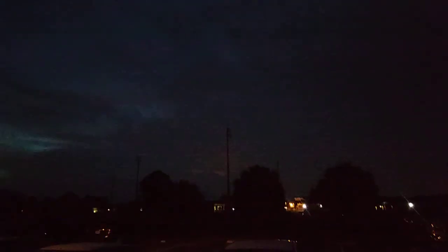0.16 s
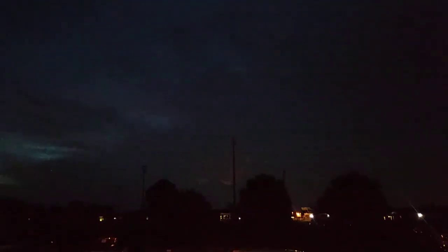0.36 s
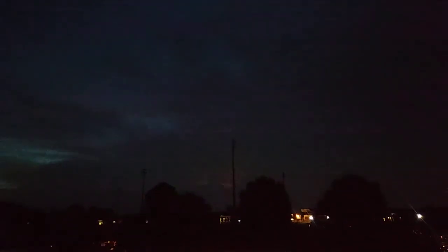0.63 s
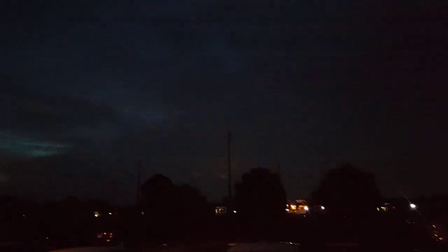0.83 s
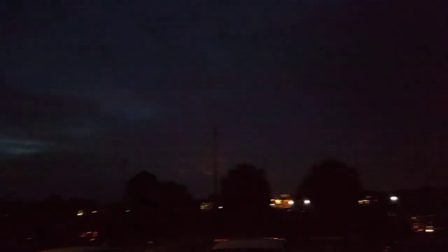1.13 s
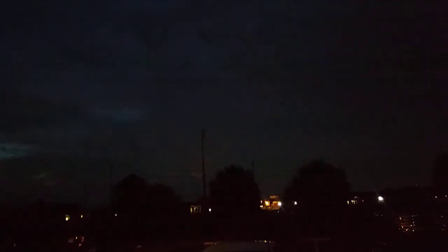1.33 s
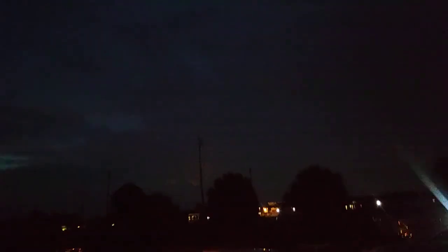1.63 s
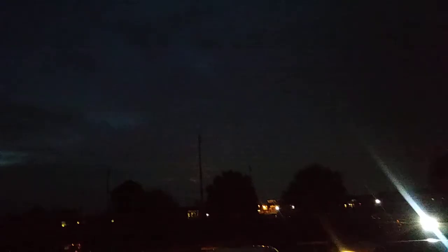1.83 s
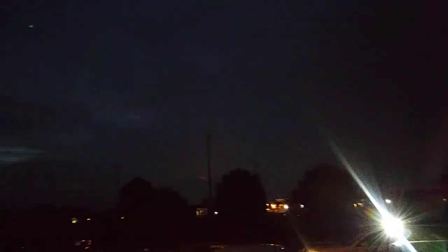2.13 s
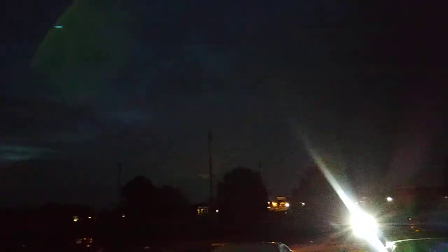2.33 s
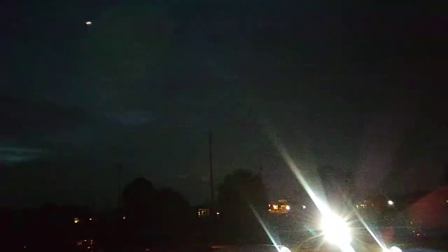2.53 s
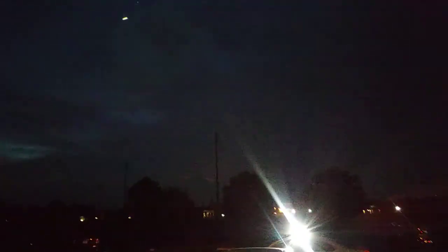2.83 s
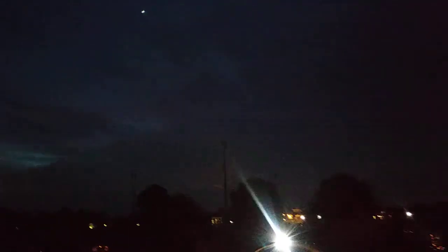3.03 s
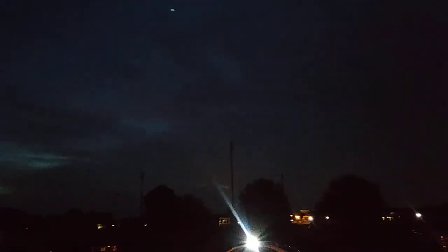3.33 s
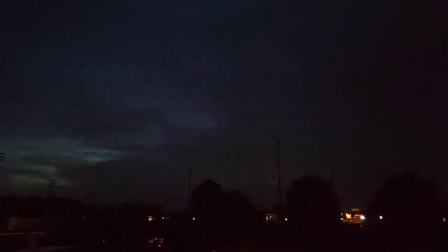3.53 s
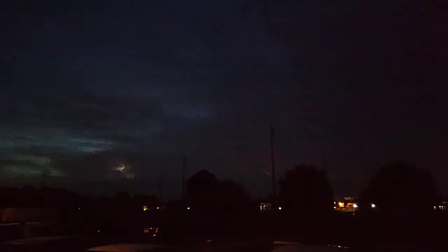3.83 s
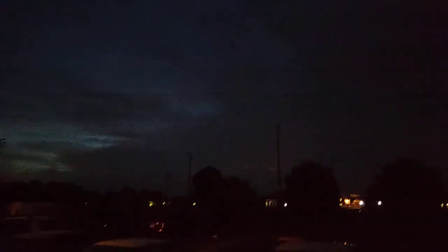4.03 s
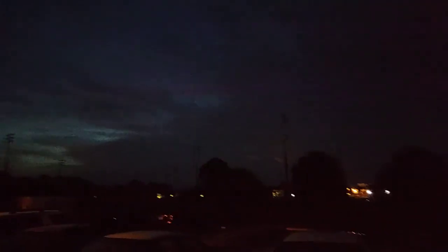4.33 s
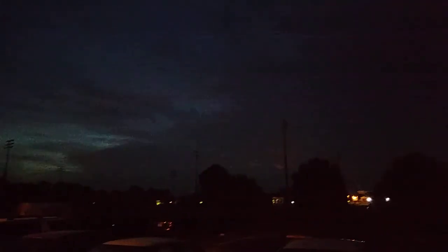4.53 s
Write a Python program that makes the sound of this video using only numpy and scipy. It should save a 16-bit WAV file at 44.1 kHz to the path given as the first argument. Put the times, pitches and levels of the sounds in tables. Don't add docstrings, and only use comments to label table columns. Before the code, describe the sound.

A handheld phone hears countless katydids hissing without pause, narrow cricket trills swelling and fading beneath, and a faint steady engine drone. A few crisp clicks come in the first half. Near the end a high rasping buzz and a woody knock coincide, followed by a loud stuttering rub on the microphone case, a tiny rattle, then thinner, darker insect sound.

```python
import sys
import numpy as np
from scipy import signal
from scipy.fft import rfft, irfft
from scipy.io import wavfile
from scipy.ndimage import uniform_filter1d

SR = 44100
rng = np.random.default_rng(int(sys.argv[2]) if len(sys.argv) > 2 else 0)


def to_linear_factor(level_db):
    exponent = np.asarray(level_db, float) / 20
    return 10 ** exponent


def digitize_waveform(pressure):
    field = np.atleast_2d(pressure).T
    bounded = np.clip(field, -1, 1)
    quanta = np.round(bounded * 32767).astype(np.int16)
    wavfile.write(sys.argv[1], SR, quanta)


N = 205991
T = np.arange(N) / SR
KNOCK_S = 3.655
DUCK_S, DUCKED_S = 4.19, 4.26
SHUT_S, SHUT_TIME_S = 4.423, 0.089


def unit(x):
    return x / np.sqrt(np.mean(x ** 2))


def noise(size=N):
    return rng.standard_normal(size)


def colour(x, points):
    hz, db = np.transpose(points)
    f = np.maximum(np.fft.rfftfreq(N, 1 / SR), 1)
    level_db = np.interp(np.log(f), np.log(hz), db, -90, -90)
    return unit(irfft(rfft(x) * to_linear_factor(level_db), N))


def ring(x, hz, *widths_hz):
    for width in widths_hz:
        x = signal.lfilter(*signal.iirpeak(hz, hz / width, SR), x)
    return x


def high_pass(x, hz, order):
    return signal.sosfilt(signal.butter(order, hz, "high", fs=SR, output="sos"), x)


def walk(rate):
    k = int(SR / rate)
    held = np.repeat(noise(N // k + 1), k)
    return unit(uniform_filter1d(uniform_filter1d(held, k), k)[:N])


def curve(table, outside=None):
    s, value = np.transpose(table)
    return np.interp(T, s, value, outside, outside)


def bumps_db(table):
    return sum(db * np.exp(-((T - s) / length) ** 2) for s, db, length in table)


def add(out, s, sound):
    i = int(s * SR)
    out[i:i + len(sound)] += sound[:N - i]


def patchy(x, subtract, floor_db):
    _, _, z = signal.stft(x, nperseg=1024, noverlap=512)
    power = np.abs(z) ** 2 + 1e-18
    across = uniform_filter1d(power, size=3, axis=0)
    now = uniform_filter1d(across, size=6, axis=1)
    steady = uniform_filter1d(across, size=120, axis=1)
    gain = np.clip(1 - subtract * steady / np.maximum(now, power / 100), to_linear_factor(floor_db), 1)
    y = signal.istft(z * gain, nperseg=1024, noverlap=512)[1][:N]
    return y * np.sqrt(np.mean(x ** 2) / np.mean(y ** 2))


def away():
    # time_s, turned_away (0-1)
    turns = [(0.0, 0.89), (0.1, 0.72), (0.3, 0.79), (0.63, 0.51), (0.8, 0.34), (0.93, 0.36), (1.32, 0.3),
             (1.78, 0.26), (2.14, 0.21), (2.4, 0.07), (2.79, 0.13), (3.05, 0.01), (3.32, 0.14),
             (3.58, 0.04), (3.77, 0.04), (4.17, 0.11)]
    return np.clip(curve(turns), 0, 1)


def ducked():
    return np.interp(T, [DUCK_S, DUCKED_S], [0, 1])


def chorus_db(index):
    # steady_db, gain_turned_away_db, gain_after_skid_db, late_drift_db_per_s
    voices = [
        (-54, 2, -5, -38),
        (-59, 2, -5.5, -2),
        (-64.5, 12.5, 7.5, .1),
        (-60, 2, 0.7, 1),
    ]
    # middle_s, level_db, length_s
    swells = [
        [(0.0, 11, 0.02), (.4, -1.5, .12), (1.39, -2.5, 0.22), (1.98, -0.5, 0.11), (2.36, 5, 0.14),
         (2.87, -2.5, 0.098), (3.2, 4, 0.13), (3.66, -2.5, 0.21), (3.82, 3.5, 0.15)],
        [(0.0, 4, 0.042), (.34, 8, 0.15), (1.2, -1, 0.07), (1.8, 5, 0.17), (2.13, -2, 0.1), (2.76, 7, 0.13),
         (3.4, -4, 0.29), (3.74, 14, 0.12), (3.92, -16, 0.085)],
        [(.13, 2.5, 0.15), (1.9, -1, 0.23), (2.45, 3.5, 0.35), (3.08, -12, 0.25), (3.66, -15, .07),
         (3.97, 2, 0.2)],
        [(.13, -1.5, 0.15), (2.05, 2.2, 0.16), (3.02, 3, 0.052), (3.71, -1.5, 0.084), (4.54, -2, 0.073)],
    ]
    steady_db, away_db, after_db, drift_db = voices[index]
    late_s = np.maximum(T - SHUT_S, 0)
    return steady_db + away_db * away() + bumps_db(swells[index]) + after_db * ducked() + drift_db * late_s


def ground():
    # pitch_hz, level_db (per Hz)
    traffic_colour = [(18, -62), (30, -30), (113, -5.5), (209, -5.5), (239, -4), (260, -8), (309, -3.5),
                      (426, -10), (579, -13), (687, -15.5), (1070, -15), (1250, -17.5), (1750, -17.5),
                      (2280, -25), (3850, -120)]
    # pitch_hz, level_db (over the traffic)
    engine_tones = [
        (118, -9.5),
        (235, -.6),
    ]
    traffic = patchy(colour(noise(), traffic_colour), subtract=0.26, floor_db=-12.0)
    hum = sum(to_linear_factor(db + 0.49 * walk(7)) * np.sin(2 * np.pi * hz * T) for hz, db in engine_tones)
    return unit(traffic + hum) * to_linear_factor(chorus_db(index=3))


def shrill():
    # pitch_hz, level_db (per Hz)
    shrill_colour = [(2120, -61.5), (3600, -30), (3850, -36), (3950, -1.5), (4190, 3), (5390, 4),
                     (7010, 1.5), (8730, -16.5), (10000, -19), (11200, -27.5), (12700, -37), (14100, -59),
                     (15500, -48.5)]
    # pitch_hz, in pairs where neighbouring bands hand over
    edges_hz = [5050, 5500, 6900, 8800, 10000, 12200]
    # facing_db, turned_away_loss_db, bend of that loss, ducked_loss_db, shut_loss_db
    band_levels = [
        (-48.5, 1.2, 0.65, 0.5, 11),
        (-47, 13, 1.46, 18.5, 24),
        (-53.5, 17, 0.86, 23, 13),
        (-62, 50, 0.77, 24, 12),
    ]
    # middle_s, level_db, length_s
    lulls = [
        (2.05, -3, .25),
        (3.84, -7, .06),
        (3.651, -8, .004),
    ]
    thinning_db_per_s = (3.5, 2.5, 0, 0)

    scrapes = noise() * to_linear_factor(0.7 * walk(700))
    spectrum = rfft(colour(scrapes, shrill_colour))
    f = np.fft.rfftfreq(N, 1 / SR)
    shares = [np.interp(f, edges_hz, np.repeat(row, 2)[1:-1]) for row in np.eye(4)]
    bands = [unit(irfft(spectrum * share, N)) for share in shares]

    startled = uniform_filter1d((T > KNOCK_S) * 1., size=400)
    frayed = to_linear_factor(-2.5) * patchy(bands[0], subtract=.85, floor_db=-18.0)
    bands[0] = ((1 - startled) * bands[0] + startled * frayed) * to_linear_factor(bumps_db(lulls))

    shut = 1 - np.exp(-np.maximum(T - SHUT_S, 0) / SHUT_TIME_S)
    learnt_s = np.clip(T, 2.22, DUCK_S) - 2.22
    out = 0
    for band, levels, thin_db in zip(bands, band_levels, thinning_db_per_s):
        facing_db, away_db, bend, duck_db, shut_db = levels
        lost_db = away_db * away() ** bend + duck_db * ducked() + shut_db * shut + thin_db * learnt_s
        out = out + band * to_linear_factor(facing_db - lost_db + 0.79 * walk(5.26))
    return out


def crickets():
    # pitch_hz, width_hz, level_db; the narrowest are single clear singers
    songs = [
        [(1815, 55, -2.5), (1876, 15.3, -2.5), (1940, 145, 2.5), (1964, 10, -5), (2054, 133, -4),
         (1607, 57, -21)],
        [(2282, 62, -3.5), (2350, 20, -11), (2495, 240, 0), (2645, 12, -5.5), (2683, 99, -2.5)],
        [(2996, 250, 0.5), (3258, 125, -1), (3340, 60, -7), (3617, 89, -8)],
    ]
    fraying = [
        .35,
        .75,
        .85,
    ]
    out = 0
    for index, (group, subtract) in enumerate(zip(songs, fraying)):
        choir = 0
        for hz, width, db in group:
            song = unit(ring(noise(), hz, 1.27 * width, 1.27 * width))
            choir = choir + to_linear_factor(db + 0.85 * walk(60)) * song
        out = out + patchy(unit(choir), subtract, floor_db=-13.5) * to_linear_factor(chorus_db(index))
    return out


def phrases():
    trills = [(0.037, -57, 2790, 0.1), (0.062, -63, 3710, 0.14), (0.06, -58.5, 3130, 0.134),
              (0.122, -59.5, 2420, 0.28), (0.206, -53, 3273, 0.13), (0.317, -56.5, 2770, 0.26),
              (0.322, -59, 3740, 0.1), (0.449, -54.5, 2406, 0.1), (0.565, -56, 3230, 0.21),
              (0.737, -56.5, 2450, 0.085), (0.975, -55, 2364, 0.25), (1.082, -62, 3090, 0.12),
              (1.199, -53, 2325, 0.12), (1.205, -62, 2799, 0.086), (1.213, -63.0, 3670, 0.104),
              (1.253, -62, 3050, 0.209), (1.37, -58.5, 2300, 0.17), (1.372, -61, 2710, 0.122),
              (1.47, -59.5, 3020, 0.089), (1.593, -58, 2282, 0.13), (1.624, -67, 3650, 0.116),
              (1.674, -59.5, 3030, 0.12), (1.787, -55.5, 2643, 0.16), (1.814, -57, 2350, 0.18),
              (1.872, -69.5, 3488, 0.23), (1.909, -62.5, 2360, 0.27), (1.98, -62, 3040, 0.14),
              (2.088, -54.5, 2337, 0.25), (2.112, -61, 3040, 0.07), (2.169, -54, 2654, 0.27),
              (2.209, -63, 3320, 0.226), (2.37, -68, 3273, 0.29), (2.508, -51, 2320, 0.17),
              (2.565, -59, 3250, 0.22), (2.779, -56.5, 2374, 0.22), (2.839, -61, 3160, 0.12),
              (2.846, -58, 2630, 0.2), (3.054, -65.5, 3273, 0.11), (3.112, -58.5, 2627, 0.14),
              (3.257, -67.5, 3370, 0.24), (3.317, -60.5, 2411, 0.18), (3.391, -60.5, 2610, 0.11),
              (3.408, -69.0, 3030, 0.17), (3.445, -71, 3630, 0.099), (3.513, -65, 3350, 0.093),
              (3.808, -52.5, 2360, 0.26), (3.856, -58, 3095, 0.16), (3.981, -60.5, 3490, 0.16),
              (4.591, -59.5, 3080, 0.168), (4.611, -67.5, 2400, 0.116),
              (.41, -69, 1600, .08), (.88, -60.5, 3300, .14), (.63, -55.5, 1860, 0.085),
               (1.97, -57.5, 1860, .1), (3.86, -58.5, 200, 0.029), (4.06, -61.5, 1100, .025),
               (4.12, -57, 1950, .06), (.58, -65.5, 590, 0.046), (.08, -66, 1590, .1),
               (1.09, -56.5, 3150, .08), (1.23, -64, 3720, .08), (1.7, -57, 1870, 0.29),
               (4.52, -60, 1950, .06), (1.75, -66, 1580, .08), (2.78, -65, 3500, 0.28),
               (3.72, -61, 3500, 0.093), (3.75, -52.5, 1350, .04), (3.86, -59.5, 1370, 0.046),
               (4.02, -60.5, 2600, .05), (4.11, -61, 2550, 0.13), (4.12, -60.5, 3100, 0.11),
               (4.46, -59.5, 3000, .12), (4.5, -67.5, 3900, 0.203), (4.61, -68, 4300, 0.11),
               (4.43, -69, 5500, .1), (2.02, -65, 1070, .03), (2.03, -65, 950, .03), (2.2, -64, 780, .03),
               (2.13, -63, 1600, .09), (2.29, -62, 1580, .04), (2.33, -66, 1400, .06),
               (2.54, -65, 1360, .025), (3.04, -65, 1050, .03), (3.09, -63, 1580, .05),
               (2.42, -64, 3700, .07), (2.85, -66, 3750, .1), (3.44, -65, 3750, .05), (.63, -66, 3800, .12),
               (.15, -63, 3760, .1), (1.05, -65, 3780, .1), (1.38, -65, 3750, .12), (1.65, -65, 3750, .08),
               (3.698, -53, 780, .02), (3.715, -48, 1250, .015), (3.693, -51, 2380, .015),
               (4.15, -60, 3300, .05), (4.44, -74, 6000, .07)]
    out, t = np.zeros(N), np.arange(SR * 3 // 5) / SR - 3 / 10
    for s, db, hz, length in trills:
        air = noise((2, len(t)))
        width = 102 * (hz / 2500) ** 1.08
        song = unit(ring(air[0], hz, width, width))
        trill_db = 1.5 * unit(uniform_filter1d(air[1], size=500))
        sound = to_linear_factor(db + trill_db) * np.exp(-np.abs(t / (0.69 * length)) ** 3) * song
        early = max(int(-(s + t[0]) * SR) + 1, 0)
        add(out, s + t[early], sound[early:])
    return patchy(out, subtract=.3, floor_db=-11.5)


def peeps():
    # middle_s, level_db (peak), pitch_hz, length_s
    blips = [(0.116, -60, 1404, 0.085), (0.237, -57, 1408, 0.065), (.24, -56.5, 128.2, 0.079),
             (0.486, -59.5, 1393, 0.36), (0.672, -57, 1405, 0.033), (1.638, -53, 560, 0.059),
             (1.782, -53.5, 519, 0.028), (1.888, -56.5, 606, 0.024), (2.122, -53, 122.9, 0.17),
             (2.45, -57.5, 907.4, 0.024), (2.609, -57, 1405, 0.047), (2.708, -56.5, 1415, 0.03),
             (2.883, -56, 1436, .03), (2.89, -62.5, 1058, 0.042), (3.097, -54, 121.2, 0.056),
             (3.203, -55.5, 1058, 0.059), (3.234, -50, 319.8, 0.043), (3.41, -66, 1050, 0.08),
             (3.446, -57, 578, 0.014), (3.547, -62, 1563, 0.04), (3.926, -57, 1142, 0.015),
             (4.584, -57.5, 313.7, 0.069), (4.647, -49, 583, 0.025), (4.632, -59.5, 1110, .03),
             (4.582, -73, 6680, 0.012), (2.885, -48.5, 2640, 0.065)]
    out, t = np.zeros(N), np.arange(SR // 5) / SR - 1 / 10
    for s, db, hz, length in blips:
        air = noise(len(t))
        wobbling_s = np.cumsum(1 + 0.011 * unit(uniform_filter1d(air, size=600))) / SR
        tone = np.sin(2 * np.pi * hz * wobbling_s) + 0.61 * unit(ring(air, hz, 39))
        ragged_db = 3.0 * unit(uniform_filter1d(air[::-1], size=500))
        add(out, s + t[0], to_linear_factor(db + ragged_db) * np.exp(-(t / (0.66 * length)) ** 2) * tone)
    return out


def buzzer():
    # start_s, end_s, start_level_db, end_level_db, stroke_rate_hz
    buzzes = [
        (.2, 0.385, -54, -46.5, 146),
        (3.6436, 3.839, -34, -29, 144.6),
    ]
    out = 0
    for start, end, first_db, last_db, rate in buzzes:
        since = T - start
        stroke = (since * rate - 46 / 2 * since ** 2) % 1
        forward = np.exp(-((stroke - .45) / 0.18) ** 2) * to_linear_factor(1.3 * walk(rate))
        back = 0.5 * np.exp(-((stroke - .88) / 0.081) ** 2) * to_linear_factor(3.1 * walk(rate))
        pitch_hz = 7690 + 1100 * (.55 - stroke) + 90 * walk(300)
        phase = 2 * np.pi * np.cumsum(pitch_hz) / SR
        tone = np.sin(phase) + to_linear_factor(-42.0) * np.sin(2 * phase)
        on = uniform_filter1d(((T > start) & (T < end)) * 1., size=200) * np.clip(since / 0.019, .35, 1)
        level_db = np.interp(T, [start, (start + end) / 2, end], [first_db, last_db - .5, last_db])
        out = out + to_linear_factor(level_db) * on * (forward + back) * tone
    tail = noise(SR // 8) * np.exp(-np.arange(SR // 8) / SR / .012)
    return out + to_linear_factor(-30.0) * signal.fftconvolve(out, tail)[:N]


def sparks():
    # start_s, level_db (peak), pitch_hz, width_hz
    snaps = [(.7213, -59, 11500, 900), (.8287, -30, 4300, 800), (.8287, -30, 5500, 1300),
             (.8755, -50, 10800, 1500), (.884, -50, 10800, 1500), (1.776, -32, 6300, 900),
             (1.8457, -56, 10600, 900), (2.04, -42, 5600, 900), (3.01, -72, 15400, 500),
             (3.5663, -52, 12300, 2500), (3.6462, -36, 7700, 500), (.8755, -34, 7200, 2500),
             (3.6465, -60, 13500, 3500), (3.662, -62, 13000, 1500)]
    out, click = np.zeros(N), signal.unit_impulse(SR // 50)
    for s, db, hz, width in snaps:
        snap = ring(click, hz, width, width, 2 * width, 2 * width)
        add(out, s, to_linear_factor(db) * snap / np.abs(snap).max())
    return out


def ticks():
    # start_s, then low_db, middle_db, upper_db, high_db (peak of each ring)
    tick_events = [
        (0.8754, -45, -25.5, -33, -33),
        (0.884, -30, -24, -36, -26.5),
        (3.646, -48, -45, -43, -37),
        (4.194, -46, -45, -29, -31),
    ]
    # pitch_hz, width_hz
    tick_modes = [
        (1920, 230),
        (3950, 650),
        (6100, 900),
        (8300, 1200),
    ]
    out, t = np.zeros(N), np.arange(SR // 20) / SR
    for s, *ring_db in tick_events:
        snap = (1.2 + noise(len(t))) * np.minimum(t / 0.000099, 1) * np.exp(-t / 0.00025)
        for db, (hz, width) in zip(ring_db, tick_modes):
            rung = ring(snap, hz, width, 2 * width, 2 * width)
            add(out, s, to_linear_factor(db) * rung / np.abs(rung).max())
    return high_pass(out, 1450, order=4)


def knock():
    # pitch_hz, level_db, t60_s, width_hz
    knock_modes = [(453, -10, 0.15, 66), (791, -5.5, 0.45, 130), (1316, -1, 0.45, 200), (1720, -7, .3, 160),
                   (2300, -5, 0.45, 350), (3050, -4.5, 0.39, 300), (3530, -11, .3, 150)]
    t = np.arange(SR) / SR
    body = 0
    for hz, db, t60, width in knock_modes:
        body = body + to_linear_factor(db) * unit(ring(noise(SR), hz, width, width)) * 1000 ** (-t / t60)
    scattered = patchy(unit(ring(noise(), 2300, 1300, 2413)), subtract=.6, floor_db=-12)[:SR]
    echoes = to_linear_factor(-2.5) * scattered * 1000 ** (-t / 1.9)
    strike_hz = 2460 - 22000 / 2 * np.minimum(t, .03)
    strike = to_linear_factor(-25.5) * np.sin(2 * np.pi * strike_hz * t) * 1000 ** (-t / 0.045)
    out = np.zeros(N)
    add(out, KNOCK_S, to_linear_factor(-29 - 14.0) * (body + echoes) * (1 - np.exp(-t / .002)))
    add(out, KNOCK_S, strike * (1 - np.exp(-t / 0.0017)))
    return out


def finger_jolts():
    # start_s, level_db (peak)
    slips = [(4.193, -20.5), (4.2034, -26.5), (4.206, -24), (4.2125, -21), (4.217, -10.5), (4.2223, -10),
             (4.2278, -12.5), (4.2316, -12.5), (4.236, -11), (4.239, -8.5), (4.2436, -5), (4.2491, -10.5),
             (4.2548, -11.5), (4.261, -16), (4.267, -13), (4.2731, -15), (4.2765, -21.5), (4.28, -25.5),
             (4.2826, -26), (4.2867, -27.5), (4.29, -28), (4.313, -33), (4.332, -35), (4.349, -34),
             (4.363, -36)]
    # pitch_hz, width_hz, level_db
    case_modes = [
        (168, 160, -10),
        (340, 260, 4),
        (574, 305, -2),
    ]
    t = np.arange(SR // 20) / SR
    push = np.exp(-((t - .0006) / 0.00035) ** 2)
    thump = sum(to_linear_factor(db) * unit(ring(push, hz, width)) for hz, width, db in case_modes)
    thump = high_pass(thump, 150, order=3)
    jolts, pump = np.zeros(N), np.zeros(N)
    for s, db in slips:
        add(jolts, s, to_linear_factor(db) * thump / np.abs(thump).max())
        add(pump, s, np.exp(-t / 0.0013))
    return jolts, pump


def rattle():
    # pitch_hz, level_db (per Hz)
    rattle_colour = [(35, -43), (60, -19.5), (120, 5), (448, -0.5), (895, -8.5), (1240, -3), (1710, -13),
                     (2980, -6), (4950, -17), (5820, -24), (15600, -42.5)]
    start_s, end_s, hold_s, fall_db_per_s = 4.28, 4.5, 0.078, 269.5
    fall_db = fall_db_per_s * np.maximum(T - start_s - hold_s, 0)
    level_db = np.maximum(-40 - fall_db, -68)
    loose = patchy(colour(noise(), rattle_colour), subtract=.5, floor_db=-13)
    return loose * to_linear_factor(level_db + 2.0 * walk(90)) * ((T > start_s) & (T < end_s))


def skid():
    # time_s, level_db (finger pressure under its peak)
    pressure = [
        (4.18, -72),
        (4.19, -21),
        (4.237, -0.7),
        (4.252, 0),
        (4.272, -7),
        (4.286, -17),
        (4.3, -36),
    ]
    # pitch_hz, level_db (per Hz)
    thud_colour = [(24, -70), (40, -43), (125, -8), (335, 8), (423, -1), (628, 4.5), (840, -15), (890, -12),
                   (1300, -4), (1690, -28), (2860, -120)]
    # pitch_hz, level_db (per Hz)
    scrape_colour = [(590, -4), (1000, -3.5), (1120, -13), (1480, -5), (1740, -9), (1990, -4.5), (2650, -7),
                     (3750, -4.5), (4200, -3), (5540, -3), (6000, -2), (15600, -36.5)]
    # time_s, share of treble added
    bite = [
        (4.193, 1.4),
        (4.21, 1.6),
        (4.235, -0.14),
        (4.255, -0.31),
        (4.285, -.7),
    ]
    pressure_db = curve(pressure, outside=-120)
    jolts, pump = finger_jolts()
    rumble = colour(noise(), thud_colour) * to_linear_factor(-19.5 + pressure_db)
    scrape_db = -14.5 + 1.51 * np.interp(T + 0.0044, T, pressure_db)
    scrape = colour(noise(), scrape_colour) * (1 + 0.3 * pump)
    scrape = scrape + curve(bite) * ring(scrape, 8000, 9000)
    return jolts + rumble + scrape * to_linear_factor(scrape_db) * (T > 4.193) + rattle()


def scene():
    background = ground() + shrill() + crickets() + phrases() + peeps()
    return (background + buzzer() + sparks() + ticks() + knock() + skid())[None]


def gate(x):
    # start_s, end_s, level_db (threshold change that lets more through)
    eased = [
        (3.56, 3.86, -15),
        (4.185, 4.45, -14),
    ]
    f, s, z = signal.stft(x, SR, nperseg=1024, noverlap=512)
    power = uniform_filter1d(uniform_filter1d(np.abs(z) ** 2, size=5, axis=0), size=4, axis=1)
    level_db = 10 * np.log10(power + 1e-18)
    limit_db = -90.5 + sum(db * (s > start) * np.clip((end - s) / .04 + .5, 0, 1) for start, end, db in eased)
    closed = (1 - np.tanh((level_db - limit_db) / 1.5)) / 2 * (f > 5300)[:, None]
    return signal.istft(z * to_linear_factor(-9.5 * closed), nperseg=1024, noverlap=512)[1][:N]


def roll_off(x):
    return signal.sosfilt(signal.butter(12, 15710, fs=SR, output="sos"), x)


def record(dry):
    hiss = to_linear_factor(-85) * unit(ring(noise(), 6500, 3000))
    rounded = 0.92 * np.tanh((gate(dry[0]) + hiss) / 0.9)
    heard = high_pass(rounded, 45, order=3)[None]
    return roll_off(heard)


dry = scene()
out = record(dry)
digitize_waveform(out)
```